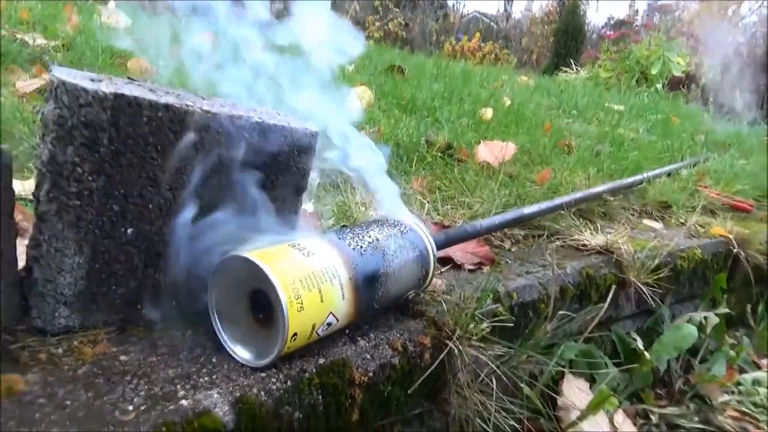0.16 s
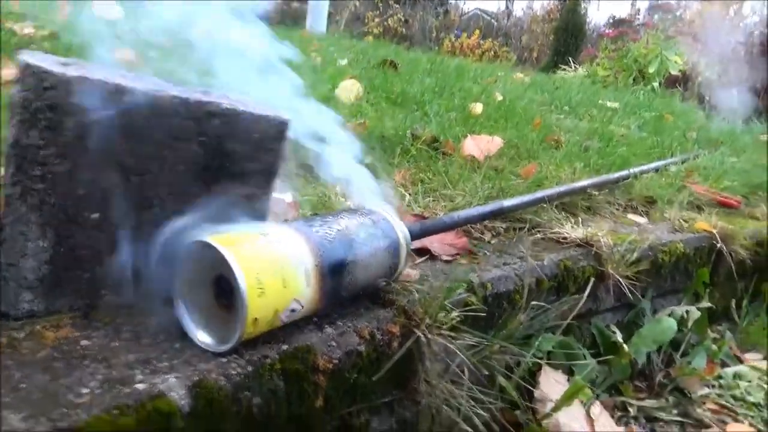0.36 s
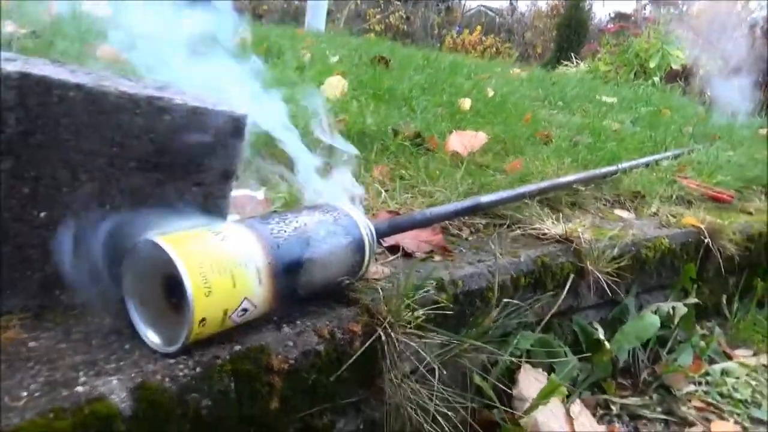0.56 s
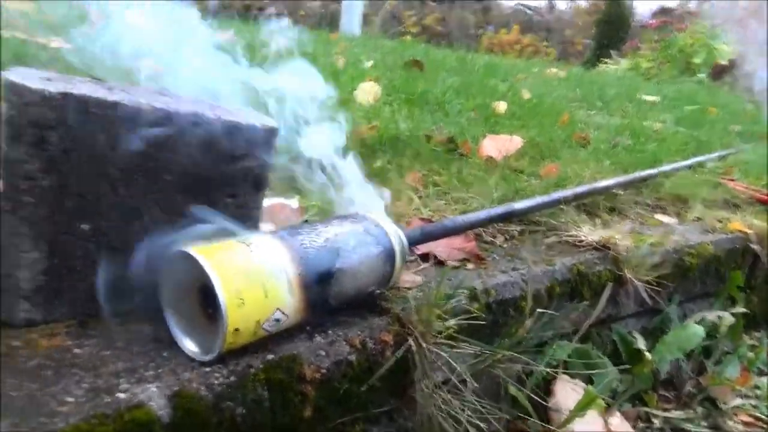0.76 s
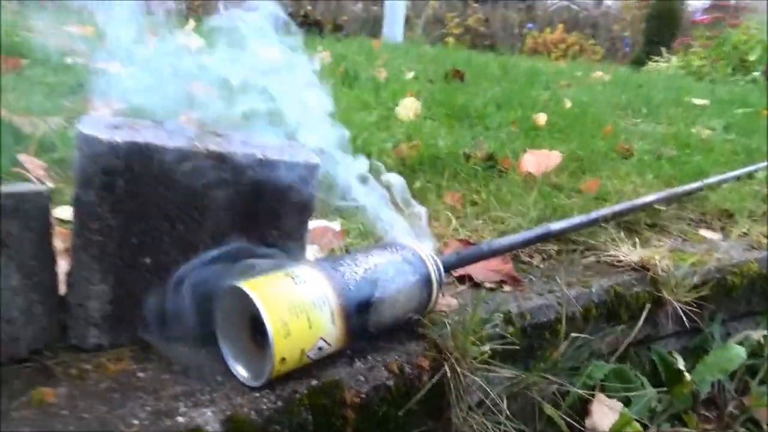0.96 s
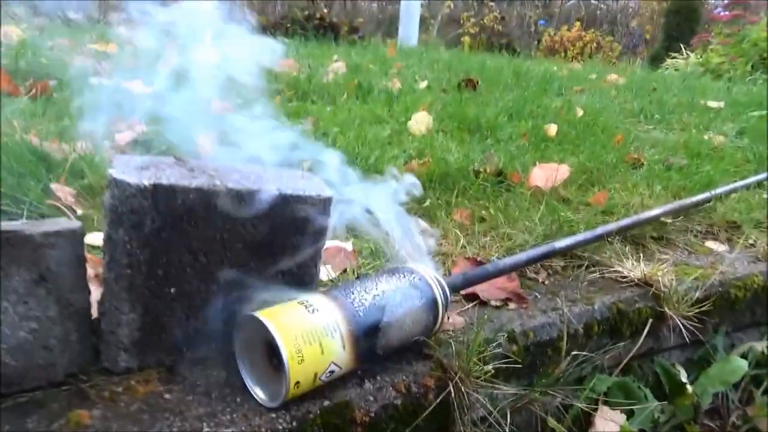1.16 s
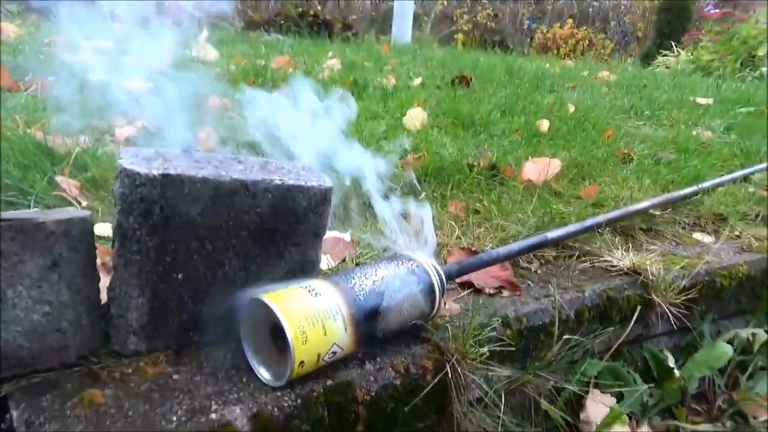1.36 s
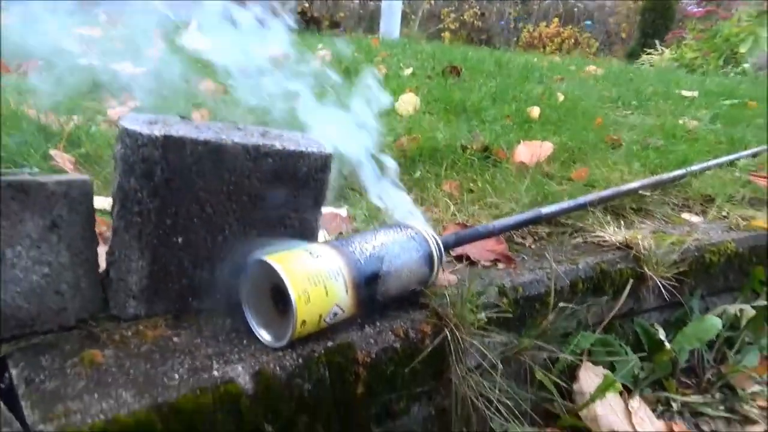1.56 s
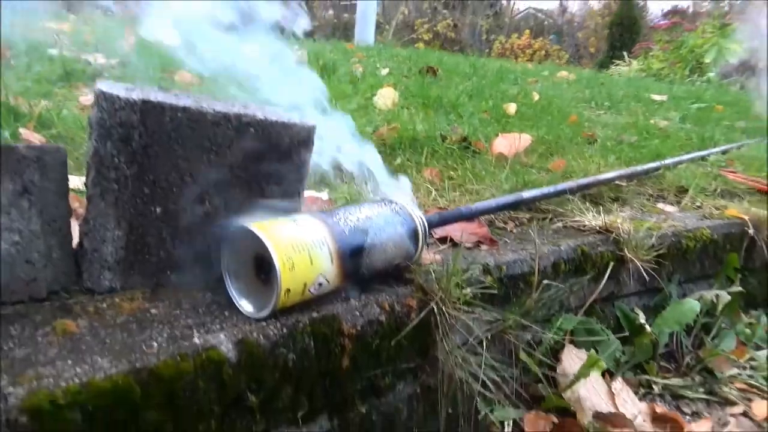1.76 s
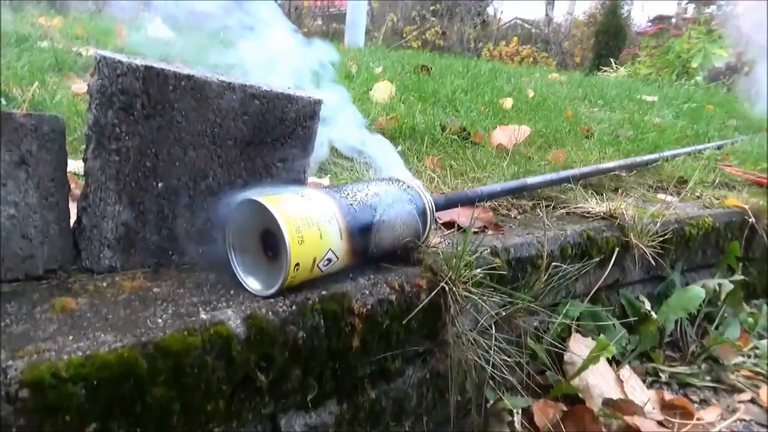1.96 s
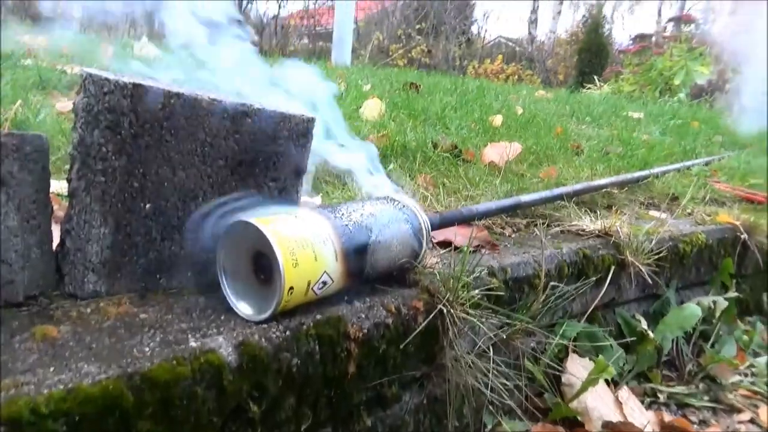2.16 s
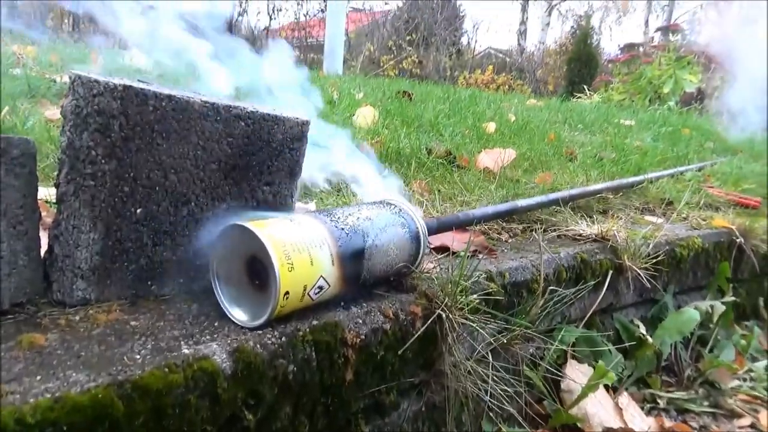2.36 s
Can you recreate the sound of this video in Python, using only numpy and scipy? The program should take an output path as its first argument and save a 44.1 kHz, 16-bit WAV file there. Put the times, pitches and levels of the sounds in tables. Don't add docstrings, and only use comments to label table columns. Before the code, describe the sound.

Loud, raspy engine drone from a can and thin pipe: fast popping, gas hiss, hollow pipe resonance and a low burning roar, hiccuping irregularly throughout; close, slightly overloaded outdoor pickup with little reverberation.

```python
import sys
import numpy as np
from scipy import signal
from scipy.fft import rfft, irfft
from scipy.io import wavfile
from scipy.ndimage import uniform_filter1d

SR = 44100
rng = np.random.default_rng(int(sys.argv[2]) if len(sys.argv) > 2 else 0)


def gain_from_db(level_db):
    decades = np.asarray(level_db, float) / 20
    return 10 ** decades


def pcm_store(signal):
    levels = np.round(np.clip(np.atleast_2d(signal), -1, 1) * 32767)
    wavfile.write(sys.argv[1], SR, levels.astype(np.int16).T)


N = 110250
POP_LEAD_S = 0.001515


def evened(x):
    return x / np.sqrt(np.mean(x ** 2) + 1e-20)


def coloured(x, curve, share=1):
    curve_hz, curve_db = np.transpose(curve)
    hz = np.fft.rfftfreq(N, 1 / SR)
    gain_db = np.interp(np.log(hz + 1), np.log(curve_hz + 1), curve_db)
    return irfft(rfft(x) * gain_from_db(share * gain_db), N)


def resonate(x, hz, width_hz):
    turn = np.exp(2j * np.pi * hz * np.arange(N) / SR)
    decay = np.exp(-np.pi * width_hz / SR)
    return 2 * (turn * signal.lfilter([1 - decay], [1, -decay], x / turn)).real


def train(times, gains):
    return np.bincount(np.clip(times * SR, 0, N).astype(int), gains, N + 1)[:N]


def humps(times, gains, widths):
    near = np.round(times * SR).astype(int)[:, None] + np.arange(-200, 200)
    phase = np.clip((near / SR - times[:, None]) / widths[:, None], -.5, .5)
    pressure = gains[:, None] * np.cos(np.pi * phase) ** 2
    return np.bincount(np.clip(near, 0, N).ravel(), pressure.ravel(), N + 1)[:N]


# pitch_hz [Hz], level_db [dB per Hz]
GARDEN_COLOUR = [(25, 8), (50, 4), (300, 19), (1500, -37), (4000, -37), (15000, -80)]


def garden():
    a, b = rng.standard_normal((2, N))
    wash = np.array([a + .25 * b, a - .25 * b])
    return gain_from_db(-33.5) * evened(coloured(wash, GARDEN_COLOUR))


# first_s [s], last_s [s], firings [count], strength_db [dB], end_change_db [dB]
RUNS = [(0.0029, 0.031, 4, -12, 11.5), (0.0352, 0.0577, 3, -5.5, 5.5), (0.0625, 0.0778, 3, -2.5, 3.2),
        (0.088, 0.108, 3, -3, 5.5), (0.1189, 0.1385, 3, 3.1, -9), (0.1468, 0.167, 3, 0.8, -7.6),
        (0.1796, 0.2099, 4, -0.5, 0.5), (0.2176, 0.2484, 4, -4.5, 5.5), (0.261, 0.2796, 3, 2.5, -5),
        (0.2877, 0.318, 4, -1.8, 2.5), (0.326, 0.3457, 3, -12, 13.5), (0.3558, 0.388, 4, 1.1, -2.5),
        (0.395, 0.4142, 3, 1.2, -2.3), (0.4253, 0.445, 3, -10, 2), (0.452, 0.4638, 3, -1.2, 0),
        (0.4741, 0.5498, 9, 0.9, -5), (0.5607, 0.6024, 5, 0.44, 0), (0.6097, 0.625, 3, 0.5, -5.5),
        (0.6377, 0.6597, 3, -2, 3.5), (0.6707, 0.739, 8, 0.1, -0.7), (0.752, 0.7698, 3, -8, 7.5),
        (0.7809, 0.8115, 4, 0.5, 0), (0.819, 0.8348, 3, -2, 2), (0.8438, 0.8726, 4, -5.6, 1.5),
        (0.887, 0.916, 4, 1.9, -3.1), (0.923, 0.9445, 3, -1.9, -1), (0.9559, 1.0247, 8, 0.7, -2),
        (1.0366, 1.0723, 5, -0.6, 0.3), (1.0826, 1.1149, 4, -8, 5), (1.1289, 1.1502, 3, -4, 5),
        (1.1622, 1.1788, 3, 4.5, -8.5), (1.187, 1.2071, 3, -0.06, 1.1), (1.2145, 1.2341, 3, -5, 6),
            (1.242, 1.2619, 3, -7.5, 9), (1.2729, 1.305, 4, 2.5, -9.5), (1.3186, 1.3515, 4, -2, 3),
            (1.3609, 1.3974, 5, 0.5, -2.5), (1.4041, 1.4635, 7, 2, -3), (1.4758, 1.4944, 3, -7.5, 6.5),
            (1.5058, 1.536, 4, 2, -3.5), (1.542, 1.5933, 6, 0.3, -3.5), (1.6059, 1.666, 7, 2, -4.5),
            (1.6795, 1.7483, 8, 1.0, 0.3), (1.7583, 1.773, 3, 0.1, -2), (1.7844, 1.8051, 3, -8, 10),
            (1.8163, 1.835, 3, 5, -9), (1.8407, 1.8618, 3, 4.5, -10.5), (1.8686, 1.9085, 4, -7.5, 7),
            (1.923, 1.9809, 8, 1.3, -2.4), (1.9881, 2.0479, 7, -0.1, 1.3), (2.0567, 2.0756, 3, -5, 8),
            (2.087, 2.1178, 5, 1.5, -5), (2.1285, 2.145, 3, 1.2, -0.4), (2.155, 2.2384, 9, 0.7, 0.9),
            (2.2473, 2.2961, 6, 1, -3), (2.3091, 2.3631, 7, -0.24, 0.8), (2.3755, 2.395, 3, 1.34, 0),
            (2.403, 2.4238, 4, 1.4, -11), (2.436, 2.4517, 3, -17.5, 15.9), (2.464, 2.502, 5, 3, -11.5)]
# time_s [s], extra_pop_db [dB], extra_hiss_db
# [dB]
UNEVEN_FIRINGS = [(0.002, -11, -8), (0.013, -16, 3), (0.02, -12.3, -7), (0.037, -7.5, -12), (0.047, -1, 14),
                  (0.128, 2.9, -17), (0.218, -4, -30), (0.328, -5, -30), (0.335, 4.5, 1.5),
                  (0.423, -14.0, -5), (0.432, -6.2, -8.5), (0.443, -14, 8), (0.451, -8, 7),
                  (0.457, -20.5, -4), (0.61, -1.5, -16), (0.626, -7, -4.5), (0.709, -12, -13),
                  (0.76, -13, -21), (0.819, -8.8, -9), (0.867, -4.3, -10), (0.944, -14, 2.5),
                  (0.986, -9, -9.3), (1.055, 2.5, -11), (1.082, 5.8, -12.5), (1.104, 2, 3.5),
                  (1.129, -23, 0), (1.14, -5, 10), (1.179, 3.5, -13.5), (1.197, -2, 4), (1.225, 5.9, 3.5),
                  (1.318, -11, 1), (1.33, -2, 5.5), (1.484, 0.5, -1), (1.495, 3.5, 9), (1.526, -1, 5.5),
                  (1.593, -5, 0), (1.796, -7, 7), (1.816, -8.5, 1.8), (1.862, -3, -12), (1.869, -3, -6.6),
                  (1.881, -11, 8), (1.939, -10, -16.5), (2.057, 6, -13), (2.103, 3, -4.5), (2.119, 6, -1),
                  (2.197, -7, 1.5), (2.297, -7.1, 1.5), (2.318, -11.5, 6.5), (2.345, -6, -9.1),
                  (2.403, -7.5, -16), (2.436, 2, -12), (2.442, -12.6, -9.5), (2.45, -13, 10),
                  (2.464, -13.5, 0.5), (2.493, 0, 12.5), (2.501, 11, 10.4)]
# time_s [s], extra_hiss_db [dB]
FLARES = [(0.063, -19), (0.071, -8), (0.108, -1.5), (0.146, -1), (0.18, 5), (0.2, -2), (0.271, 6.5),
          (0.308, 4.5), (0.367, 5), (0.396, -5), (0.405, 3.8), (0.415, -5.3), (0.451, 2), (0.463, 3.5),
          (0.502, 3.5), (0.521, -8), (0.739, -2), (0.769, 3.5), (0.791, 5), (0.801, 2.5), (0.887, 4),
          (0.916, -4), (0.995, -2), (1.037, 3.5), (1.129, 2), (1.162, 3), (1.17, 2.5), (1.207, 5.5),
          (1.225, 0), (1.243, -6.9), (1.262, 4), (1.294, 4.5), (1.341, 4.5), (1.352, 4), (1.396, -3),
          (1.526, 3.5), (1.543, -10), (1.573, 2.5), (1.605, -5.2), (1.615, 2.5), (1.626, 5), (1.679, 3),
          (1.689, 3), (1.699, -4), (1.719, -3), (1.739, 4), (1.796, -4), (1.825, 7.5), (1.834, -12),
          (1.908, 6.5), (1.923, 5), (1.964, -7), (2.009, -3), (2.257, -6), (2.267, 2.5), (2.297, -5),
          (2.311, 2.5), (2.337, -2), (2.375, 3), (2.483, 7.1)]


def firings():
    fade_firings, jitter_s, spread_db = 1.62, 0.00025, 0.47
    rows = []
    for first_s, last_s, count, strength_db, end_change_db in RUNS:
        k = np.arange(round(count))
        run_times = first_s + (last_s - first_s) * k / k[-1]
        run_db = strength_db + end_change_db * np.exp((k - k[-1]) / fade_firings)
        rows += zip(run_times, run_db)
    times, db = np.transpose(rows)
    extra_db = np.zeros((2, len(rows)))
    for time_s, extra_pop_db, extra_hiss_db in UNEVEN_FIRINGS:
        extra_db[:, np.argmin(abs(times - time_s))] = extra_pop_db, extra_hiss_db
    for time_s, extra_hiss_db in FLARES:
        extra_db[1, np.argmin(abs(times - time_s))] += extra_hiss_db
    chance = np.clip(rng.standard_normal((len(rows), 10)), -2, 2).T
    return times + jitter_s * chance[0], db + spread_db * chance[1], chance[2:], extra_db


CYCLE_LIMITS = .008, .0115


def charge_strength(times, db):
    intake_s = np.clip(np.diff(times, prepend=0), *CYCLE_LIMITS)
    return db + 680 * (intake_s - .0095)


def pop(times, charge_db, chance, extra_pop_db):
    level_db = -12.5 + extra_pop_db + 0.82 * charge_db + 0.96 * chance[0]
    width_s = .0014 * (1 - 0.037 * charge_db + 0.039 * chance[1])
    return humps(times - POP_LEAD_S, gain_from_db(level_db), width_s)


def neck(pops):
    return gain_from_db(-8) * resonate(pops, hz=960, width_hz=170)


# pitch_hz [Hz], level_db [dB per Hz]
JET_COLOUR = [(1200, -19), (1500, -8.5), (2000, -2.5), (3200, 1.5), (4500, -7.5), (9000, 0), (13500, -7.5),
              (16000, -13.5)]
# pitch_hz [Hz], level_db [dB]
JET_WIDE = [(1200, -28), (2500, -21), (5000, -14.5), (9000, -14.5), (14000, -18)]
# pitch_hz [Hz], level_db [dB]
JET_PARTS = [
    [(2500, 0), (5000, -15)],
    [(2500, -15), (5000, 0), (8000, -2), (12000, -15)],
    [(6000, -15), (11000, 0)],
]
PART_LAW = 0.77, 0.95, 1.23


def jet(times, db, chance, extra_hiss_db):
    peak_s, rise_width_s, fall_width_s = 0.0017, 0.0015, 0.0015
    t = np.arange(1500) / SR
    width_s = np.where(t < peak_s, rise_width_s, fall_width_s)
    burst = np.exp(-((t - peak_s) / width_s) ** 2 / 2)
    leak = gain_from_db(-7.5) * np.exp(-t / 0.0054) * np.minimum(t / peak_s, 1)
    eddies = gain_from_db(2 * evened(uniform_filter1d(rng.standard_normal(N), size=20)))
    hiss = 0
    for part, law, luck in zip(JET_PARTS, PART_LAW, chance[5:]):
        starts = times - POP_LEAD_S - .0007 + 0.00046 * luck[::-1]
        level_db = law * (2.5 * db + extra_hiss_db) + 2 * luck
        gate = signal.oaconvolve(train(starts, gain_from_db(level_db)), burst + leak)[:N]
        hiss = hiss + coloured(gate * eddies * rng.standard_normal((2, N)), part)
    hiss = gain_from_db(-35) * evened(coloured(hiss, [(600, -50)] + JET_COLOUR))

    swell = signal.oaconvolve(train(times, gain_from_db(0.43 * db)), np.hanning(500), "same")
    can = []
    for noise in rng.standard_normal((2, N)):
        once = resonate(swell * noise, hz=2500, width_hz=450)
        can.append(resonate(once, hz=2500, width_hz=450))
    mid, side = hiss + gain_from_db(-53) * evened(np.array(can))
    return mid + np.array([[1], [-1]]) * coloured(side, JET_WIDE)


def wall_echo(times, charge_db, chance):
    delay_s, width_s = 0.0027, .0014 * 1.33
    gains = gain_from_db(charge_db + 2.9 * chance[2])
    return gain_from_db(-21.5) * humps(times - POP_LEAD_S + delay_s, gains, width_s + 0 * charge_db)


def puff(times, charge_db, chance):
    puff_db = -12
    cycle_s = np.clip(np.diff(times, append=9), *CYCLE_LIMITS)
    lag_s = (.00495 + .3 * (cycle_s - .01)) * (1 + .035 * chance[3])
    at = times - POP_LEAD_S + lag_s
    body_db = puff_db - 500 * (cycle_s - 0.0084) + 1.08 * charge_db + .8 * chance[4]
    body_s = .0056 * (1 + 60 * (cycle_s - .0095) + 0.071 * chance[1])
    tip_db = puff_db - 12 + charge_db + 0.74 * chance[0]
    tip_s = 0.0017 + 0 * charge_db
    return humps(at, gain_from_db(body_db), body_s) + humps(at, gain_from_db(tip_db), tip_s)


# pitch_hz [Hz], width_hz [Hz], level_db [dB]
PIPE_RINGING = [(117.7, 32, -10), (181, 6.7, -21), (432, 20, -45)]


def pipe_ringing(push):
    return sum(gain_from_db(level_db) * resonate(push, hz, width_hz) for hz, width_hz, level_db in PIPE_RINGING)


# pitch_hz [Hz], level_db [dB]
ROAR_COLOUR = [(60, -12), (110, 0), (250, -2), (500, -4), (900, -8), (1200, -22)]


def roar(times, db):
    swell = signal.oaconvolve(train(times, gain_from_db(2.0 * db)), np.hanning(1100), "same")
    burning = coloured(rng.standard_normal(N), [(20, -30)] + ROAR_COLOUR + [(2500, -34)])
    return gain_from_db(-33.5) * evened(swell * burning)


# pitch_hz [Hz], left_minus_right_db [dB]
LEAN = [(60, 1.5), (200, 2.5), (700, 2.5), (1400, -2.8), (4000, 0), (15000, 0.1)]


def at_microphones(low, hiss):
    mic_hz, slab_db, slab_s = 87.4, -28, 0.00097
    hz = np.fft.rfftfreq(N, 1 / SR)
    low = rfft(low) / (1 + (mic_hz / (hz + 1e-3)) ** 4)
    slab = gain_from_db(slab_db) * np.exp(-2j * np.pi * hz * slab_s) * np.array([[1], [-1]])
    left, right = irfft(low * (1 + slab), N) + hiss
    return np.array([coloured(left, LEAN, 1 / 2), coloured(right, LEAN, -1 / 2)])


def scene():
    air = garden()
    times, db, chance, (extra_pop_db, extra_hiss_db) = firings()
    charge_db = charge_strength(times, db)
    pops = pop(times, charge_db, chance, extra_pop_db)
    hiss = jet(times, db, chance, extra_hiss_db)
    puffs = puff(times, charge_db, chance)
    low = pops + neck(pops) + wall_echo(times, charge_db, chance) + puffs
    low = low + pipe_ringing(puffs + pops) + roar(times, db)
    return at_microphones(low, hiss) + air


def top_cut(x):
    return signal.sosfilt(signal.butter(12, 16500, fs=SR, output="sos"), x)


def record(dry):
    limit, edge_hz = .5, 15900
    squeezed = limit * np.tanh(dry / limit)
    low_pass = signal.firwin(301, edge_hz, window=("kaiser", 8), fs=SR)
    mix = signal.oaconvolve(squeezed, low_pass[None], "same")
    return top_cut(mix)


dry = scene()
out = record(dry)
pcm_store(out)
```